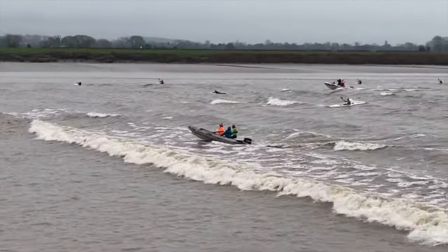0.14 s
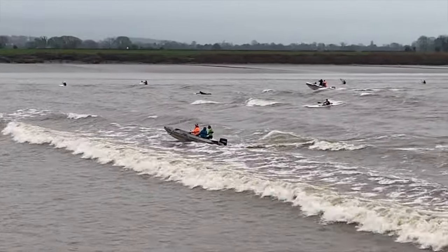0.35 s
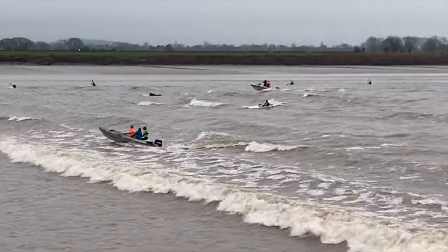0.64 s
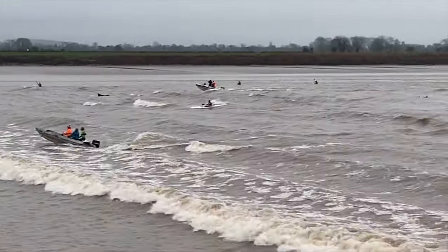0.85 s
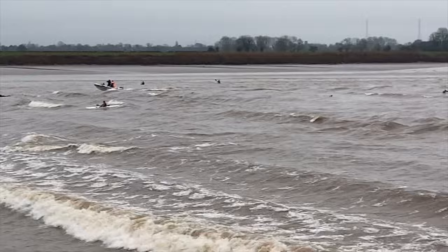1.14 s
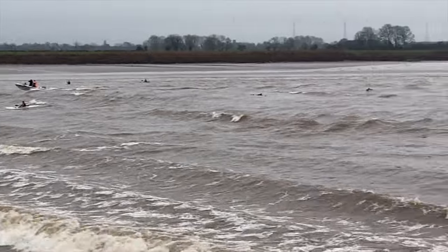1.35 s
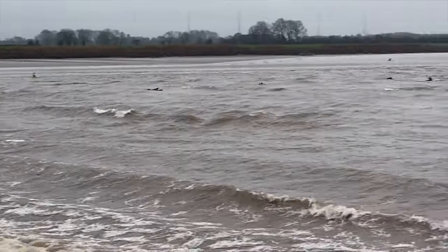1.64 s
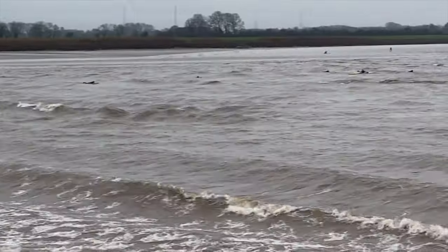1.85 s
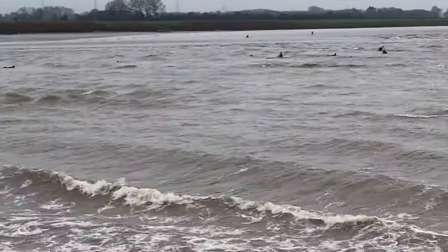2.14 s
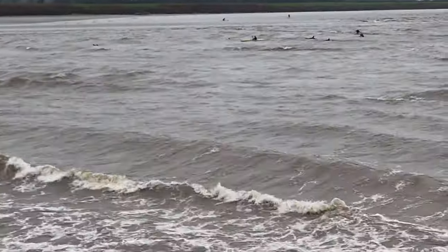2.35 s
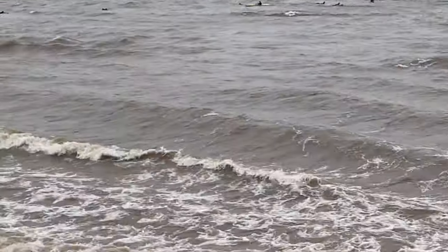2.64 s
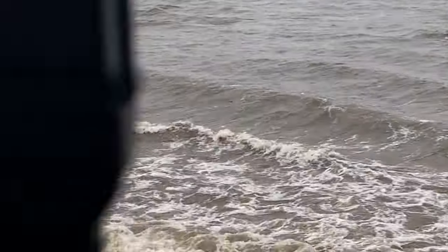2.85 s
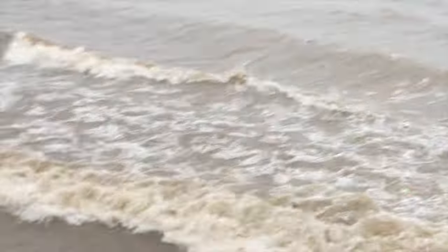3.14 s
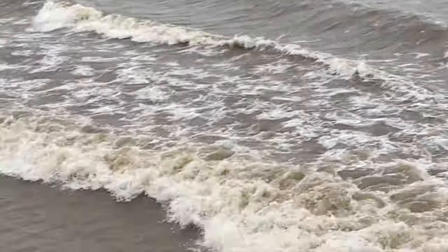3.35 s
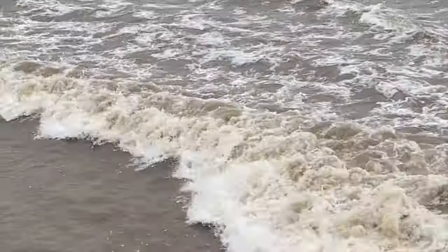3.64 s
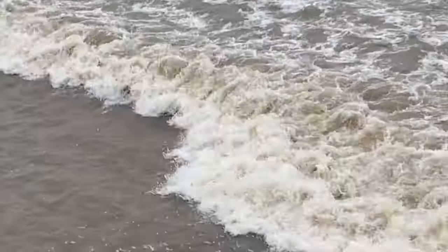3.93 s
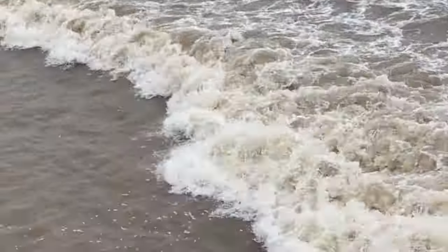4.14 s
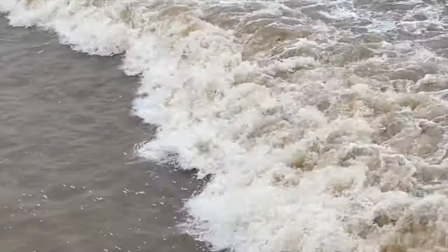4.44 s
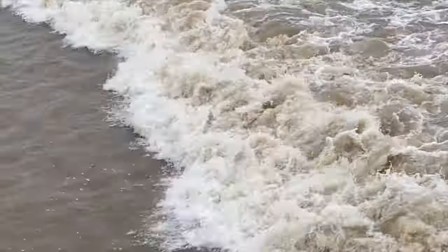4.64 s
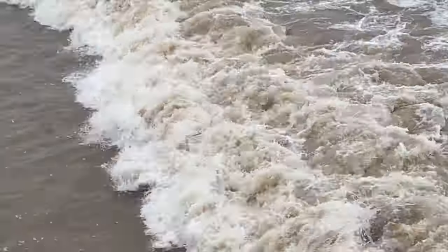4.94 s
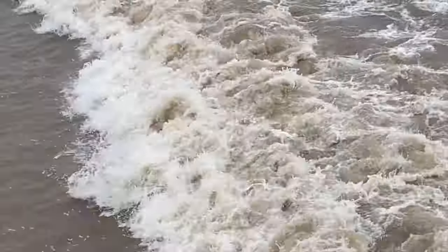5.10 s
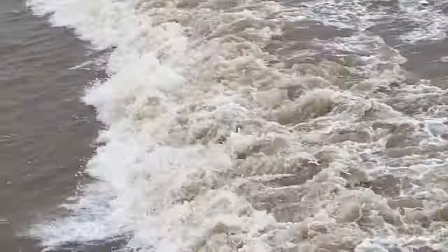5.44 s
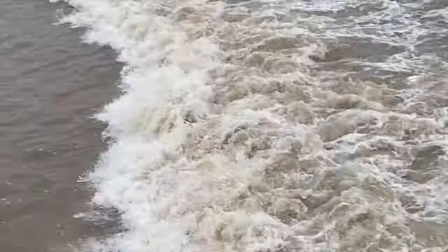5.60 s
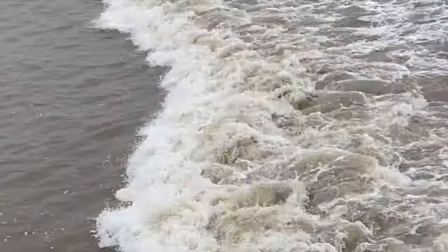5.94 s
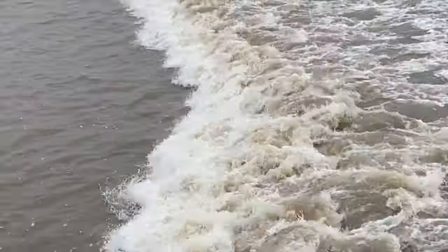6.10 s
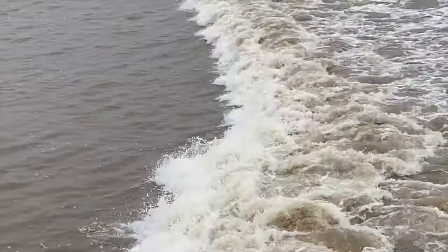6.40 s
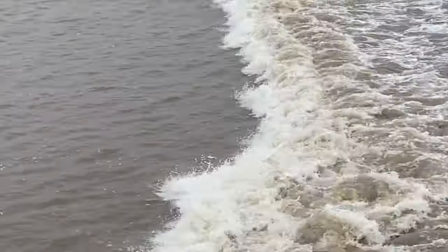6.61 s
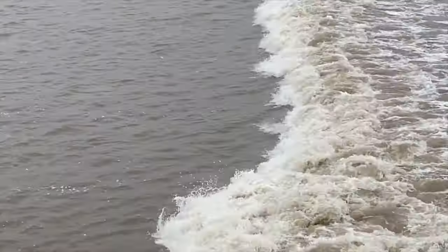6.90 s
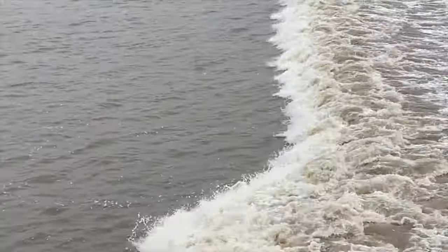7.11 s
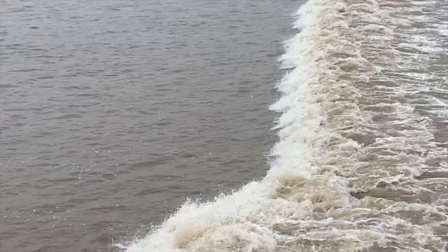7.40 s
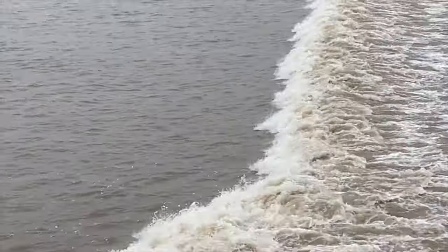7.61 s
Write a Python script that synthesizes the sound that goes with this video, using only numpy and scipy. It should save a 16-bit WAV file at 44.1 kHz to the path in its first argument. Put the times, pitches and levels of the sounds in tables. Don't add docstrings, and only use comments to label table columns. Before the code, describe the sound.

Muddy river wave churns past with continuous hissing, rushing white water, as gusty wind thumps and buffets the handheld outdoor microphone.

```python
import sys
import numpy as np
from scipy import signal
from scipy.fft import rfft, irfft, next_fast_len
from scipy.io import wavfile
from scipy.ndimage import uniform_filter1d

SR = 44100
rng = np.random.default_rng(int(sys.argv[2]) if len(sys.argv) > 2 else 0)


def dump_mix(stems):
    frames = np.atleast_2d(stems).T
    limited = np.clip(frames, -1, 1)
    pcm = np.round(limited * 32767).astype(np.int16)
    wavfile.write(sys.argv[1], SR, pcm)


def ratio_of_db(decibels):
    return 10 ** (np.asarray(decibels, float) / 20)


N = 342194

# time in seconds, breeze level in dB, likeness at the ports (0-1).
BREEZE = [(0, -25, 0.6), (.45, -25, 0.49), (.85, -31.5, 0.23), (1.2, -37, 0.7), (1.65, -29.5, 0.92),
          (2.1, -40, 0.46), (2.5, -34, 0.8), (2.9, -39, 1), (3.4, -50, .83), (4, -44, 0.78),
          (4.7, -37, 0.6), (5.1, -46, 0.3), (5.6, -39, 0), (6, -25.5, 0.04), (6.4, -21.5, 0.18),
          (6.9, -24.5, 0.46), (7.4, -34, 0.23), (7.76, -22.5, .37)]
# start in seconds, peak in dB, centre in Hz, treble share in dB.
POPS = [(.146, -16, 183, -21), (.217, -6, 287, -15), (.339, -2.5, 252, -1), (.469, -11, 620, -9),
        (.516, 0, 323, -11), (.666, -6, 200, -16.5), (1.262, -10.5, 590, -26), (1.791, -9, 186, -26),
        (1.867, -4, 350, -14), (2.155, -5, 180, -19), (3.484, -1, 308, -24), (4.033, -1, 464, -17.5),
        (4.101, -1.5, 636, -16), (4.66, -12, 270, -14), (4.724, -8, 215, -2), (4.805, 2, 630, -14),
        (5.007, -3.5, 218, -18), (5.302, -12, 810, -11), (6.009, -10, 604, -4), (6.045, -6.5, 350, -9),
        (6.171, -7.5, 330, -19), (6.272, -6.5, 710, -10), (6.438, -9, 260, -6), (6.713, -8, 590, -6),
        (7.014, -1, 626, -15), (7.208, -2.5, 385, -20), (7.305, -2, 363, -11.5), (7.393, -4, 888, -5),
        (7.469, -9, 224, -7), (7.714, -17, 385, -10)]
# start in seconds, peak in dB, centre in Hz.
PATS = [(0.368, -22, 172), (.545, -8, 299), (0.796, -12, 272), (0.925, -15, 400), (.961, -13.5, 172),
        (2.047, -11.5, 286), (2.09, -14, 246), (2.241, -9.5, 172), (3.451, -8, 258), (3.668, -7.5, 237),
        (3.776, -7, 323), (3.857, -14, 495), (4.068, -14, 500), (4.182, -8.5, 244), (4.435, -9, 200),
        (4.515, -11.5, 203), (5.087, -9.5, 282), (5.379, -8, 420), (5.497, -12, 180), (5.655, -11.5, 263),
        (5.796, -11, 350), (5.98, -9, 186), (6.197, -11, 684), (6.609, -14, 340), (6.823, -11, 305),
        (6.997, -7, 277), (7.039, -8, 318), (7.156, -9, 460), (7.374, -13, 778), (7.734, -14, 546)]


def evened(x):
    return x / np.sqrt(np.mean(x ** 2) + 1e-20)


def read(points, hz):
    f, value = np.transpose(points)
    return np.interp(np.log(hz + 1), np.log(f + 1), value)


def columns(rows, t):
    s, *values = np.transpose(rows)
    return [np.interp(t, s, v) for v in values]


def add(mix, s, sound):
    part = mix[:, round(s * SR):][:, :sound.shape[1]]
    part += sound[:, :part.shape[1]]


def grid(size):
    return np.fft.rfftfreq(size, 1 / SR)[:, None], np.arange(4 * N // size + 5) * size / 4 / SR


def drift(shape, *spans):
    x = rng.standard_normal(shape[::-1]).T
    for axis, span in enumerate(spans):
        width = max(int(span), 1)
        x = uniform_filter1d(uniform_filter1d(x, width, axis), width, axis)
    return evened(x)


def port_noise(gain, same, lead=0):
    a, b, c, d = rng.standard_normal(gain.shape[::-1] + (4,)).T
    same = np.clip(same, 0, 1)
    left = a + 1j * b
    right = same * left + np.sqrt(1 - same ** 2) * (c + 1j * d)
    half = np.exp(1j * lead / 2)
    z = gain * np.array([left * half, right / half])
    size = 2 * len(gain) - 2
    return signal.istft(z, nperseg=size, noverlap=3 * size // 4)[1][:, :N]


def unit(shape):
    return shape / np.sqrt(np.sum(shape ** 2, 0))


def steadied(x, span_s):
    return x / np.sqrt(abs(uniform_filter1d((x ** 2).mean(0), round(span_s * SR))) + 1e-12)


def top_of(bright_db, base_hz, per_db):
    return base_hz * np.exp(per_db * np.clip(bright_db, -30, 6))


def bumps(rows, t):
    s, length, db = np.transpose(rows)[:3, :, None]
    flank_steepness = 2.23
    return ratio_of_db(db) ** 2 * np.exp(-abs(2 * (t - s) / length) ** flank_steepness)


def surf(spray_hz=8000, wash_hz=1750, churn_hz=1200, patchy_db=0.55, flicker_db=0.84, sway_rad=0.025, level_db=7):
    # time in seconds, nearness as fizz in dB, turn to the foam in dB.
    wave = [(0, -32.5, -9.5), (.5, -33, -5), (1.1, -33, -4), (1.5, -35, 2.5), (1.9, -35.5, 5),
            (2.3, -34.5, 2.5), (2.75, -34, 4), (3.08, -35.5, 6.5), (3.2, -32.5, 1.5), (3.5, -31, -2.5),
            (4.6, -28.5, -2), (4.9, -31.5, 1), (5.25, -30.5, 0.5), (6, -32, 2), (7, -34.5, 1.5),
            (7.76, -35.5, 0.5)]
    # frequency in Hz, density in dB per Hz.
    foam = [(32, -40), (62, -7), (220, -4.5), (640, -6.5), (1100, -5.5), (1800, -7.5), (2500, -12.5),
            (3300, -10.5), (4200, -13.5), (5600, -15.5), (7400, -20.5), (9000, -20.5), (11000, -25.5),
            (15600, -27.5)]
    # frequency in Hz, likeness (0-1).
    alike = [(70, .97), (140, .65), (300, .75), (800, .7), (1200, .35), (1700, .15), (2000, .8),
             (2250, .97), (2400, 1), (16000, 1)]
    # frequency in Hz, lead of the left port in rad.
    port_lead = [(7450, 0), (7700, -1.), (8800, -2.9), (9500, -3.45), (9850, -4.3), (10700, -6.05),
                 (11600, -6.5), (12100, -7.6), (12900, -9.25), (13650, -9.65), (14700, -12.),
                 (15100, -12.57)]
    hz, t = grid(size=1024)
    fizz_db, turn_db = columns(wave, t)

    churn_db = 5.5 + 0.59 * turn_db - 0.1672 * t
    not_arrived = 1 / (1 + np.exp((t - 0.43) / 1))
    wash_db = -1.5 + 0.41 * turn_db + 0.53 * t - 3 * not_arrived
    spray_db = 0.76 * turn_db + 0.65 * (fizz_db + 36)

    high = hz ** 2 / (hz ** 2 + spray_hz ** 2)
    middle = np.exp(-(np.log2((hz + 1) / wash_hz) / 0.44) ** 2)
    low = 1 / (1 + (hz / churn_hz) ** 4)
    field_db = fizz_db + high * spray_db + middle * wash_db + low * churn_db + level_db
    patches = patchy_db * drift(field_db.shape, 9.1, 8)
    flicker = flicker_db * high * drift(t.shape, 3.7)
    gain = unit(ratio_of_db(read(foam, hz))) * ratio_of_db(field_db + patches + flicker)
    lead = read(port_lead, hz) + sway_rad * drift(field_db.shape, 8, 6.1)
    return port_noise(gain, read(alike, hz), lead)


def rumble(level_db=0.5, apart_hz=200):
    # frequency in Hz, density in dB per Hz.
    colour = [(12, -41), (20, -11), (42, 4), (65, 8), (89, 0.5), (178, -11.5), (300, -21.5), (390, -47),
              (660, -120)]
    # centre in seconds, length in seconds, strength in dB.
    swells = [(.18, 0.055, -20), (.39, 0.087, -14), (.46, .07, -15.5), (.55, .08, -19), (.7, 0.05, -14.5),
              (.82, 0.053, -23), (.97, 0.1, -26), (1.28, 0.027, -28), (1.7, .05, -26), (1.83, 0.048, -14.5),
              (2.19, 0.24, -21.5), (2.5, 0.089, -27), (3.52, 0.1, -27), (3.77, 0.18, -25),
              (4.16, 0.39, -22), (4.71, 0.34, -21), (5.08, 0.17, -17.5), (5.36, .03, -23),
              (5.52, 0.11, -23.5), (5.7, 0.06, -23), (5.83, 0.074, -24), (6.02, 0.11, -27),
              (6.31, .27, -26), (6.52, 0.036, -16), (6.65, 0.043, -13), (6.99, 0.12, -19.5),
              (7.08, 0.044, -18), (7.28, 0.11, -19), (7.43, 0.17, -19.5), (7.72, 0.049, -19)]
    hz, t = grid(size=1024)
    breeze_db, likeness = columns(BREEZE, t)
    apart = (1 - likeness) * np.clip(hz / apart_hz, 0, 1) ** 2.4
    eddies = port_noise(ratio_of_db(read(colour, hz) + 0 * t), 1 - apart)
    lumps = evened(steadied(eddies, 0.079))
    wake_lag_s, wake_s, wake_db = 0.018, 0.018, -18
    wakes = [(s + wake_lag_s, wake_s, db + wake_db) for s, db, *_ in POPS + PATS]
    power = ratio_of_db(breeze_db) ** 2 + bumps(swells + wakes, t).sum(0)
    return lumps * np.interp(np.arange(N) / SR, t, np.sqrt(power)) * ratio_of_db(level_db)


def flutter(lumps_db=2.16, patchy_db=4.5, foot_hz=130, breeze_db=-8, bond=0.13, calm_db=-12, treble_db=3):
    # centre in seconds, length in seconds, strength in dB, treble share in dB.
    clumps = [(0.047, 0.065, -21, -15), (0.164, 0.036, -18.5, -14), (0.349, 0.027, -12, -10),
              (0.429, 0.064, -17.5, -9.5), (0.554, 0.13, -25, -6), (0.659, 0.06, -27, -9),
              (.95, .12, -43, -15), (1.799, 0.064, -17, -14.5), (2.18, 0.16, -27.5, 0),
              (2.5, .06, -23, -22), (3.253, 0.56, -27, -10), (3.74, 0.45, -24.5, -7.5),
              (4.084, 0.15, -20, -7.5), (4.684, 0.21, -21, -15), (4.795, 0.028, -22, -6),
              (5.03, 0.3, -29.5, -12), (5.45, 0.15, -27, -10), (5.85, 0.063, -23, -11),
              (6.043, 0.17, -24.5, -5), (6.186, 0.08, -15.5, -0.5), (6.293, 0.045, -17.5, -5),
              (6.392, .1, -19, -2.5), (6.62, 0.057, -18.5, -3), (6.75, 0.19, -23.5, -6),
              (7.024, .11, -19, -9), (7.14, 0.041, -23, -1), (7.237, 0.052, -20, -20),
              (7.314, 0.026, -15.5, -4), (7.406, 0.16, -19.5, 1), (7.746, .08, -16, -6)]
    hz, t = grid(size=256)
    wind_db, likeness = columns(BREEZE, t)
    calm = ratio_of_db(wind_db + breeze_db) ** 2
    gusts = bumps(clumps, t)
    power = calm + gusts.sum(0)
    share_db = (calm * calm_db + np.transpose(clumps)[3] @ gusts) / power
    lumps = drift(t.shape, 9.5)
    top_hz = top_of(share_db + treble_db + 0.62 * lumps, 923, 0.061)
    shape = hz ** 2 / (hz ** 2 + foot_hz ** 2) * np.exp(-(hz / top_hz) ** 1.7)
    patches = ratio_of_db(patchy_db * drift(shape.shape, 2, 4.4))
    eddies = port_noise(unit(shape) * patches, bond + (1 - bond) * likeness)
    swell = np.interp(np.arange(N) / SR, t, np.sqrt(power) * ratio_of_db(lumps_db * lumps))
    return steadied(eddies, 0.027) * swell


def pops(rough=2.12, cycles=2.48, peak_db=8, octaves=0.25, level_db=2.0, pat_treble_db=-16.5, pan_spread_db=5):
    out = np.zeros((2, N))
    t = (np.arange(2048) - 512) / SR
    hz = np.fft.rfftfreq(2048, 1 / SR)
    rows = POPS + [(*row, pat_treble_db) for row in PATS]
    chance = rng.standard_normal((len(rows), 3, 2048))
    for (s, db, centre_hz, bright_db), (both, *own) in zip(rows, chance):
        same = 0.28 + 0.61 * np.clip(columns(BREEZE, s)[1], 0, 1)
        pan_db = pan_spread_db * (1 - same) * both[0]
        body = np.exp(-(t * centre_hz / cycles * np.where(t < 0, 1.7, .8)) ** 2)
        ragged = (same * both + (1 - same) * np.array(own)) * body
        ragged = ragged / np.linalg.norm(ragged, axis=1, keepdims=True)
        kick = same * (t == 0) + rough * (1 - same) * ragged
        colour = ratio_of_db(peak_db * np.exp(-(np.log2((hz + 1) / centre_hz) / octaves) ** 2))
        dull = np.exp(-(hz / top_of(bright_db, 1750, 0.046)) ** 2)
        kick = irfft(rfft(kick) * colour * dull)
        port_db = db + level_db + pan_db * np.array([[.5], [-.5]])
        add(out, s - .009, ratio_of_db(port_db) * kick / abs(kick).max())
    return out


def late_bass(x, turns=1.497):
    size = next_fast_len(N + SR)
    hz = np.fft.rfftfreq(size, 1 / SR)
    lag = np.exp(-2j * np.pi * turns * np.log((hz + 30) / (hz + 3000)))
    return irfft(rfft(x, size) * lag, size)[:, :N]


def scene():
    return surf() + rumble() + late_bass(flutter() + pops())


def roll_off(x):
    return signal.sosfilt(signal.butter(12, 17060, fs=SR, output="sos"), x)


def record(dry):
    cut = signal.sosfiltfilt(signal.butter(3, 36, "highpass", fs=SR, output="sos"), dry)
    limited = cut / (1 + abs(cut) ** 4) ** (1 / 4)
    left, right = signal.oaconvolve(limited, signal.firwin(511, 15750, fs=SR)[None], "same")
    outside = signal.firwin(1023, (2450, 7450), fs=SR, window=("kaiser", 8))
    side = signal.oaconvolve((left - right) / 2, outside, "same")
    return roll_off((left + right) / 2 + np.array([side, -side]))


dry = scene()
out = record(dry)
dump_mix(out)
```